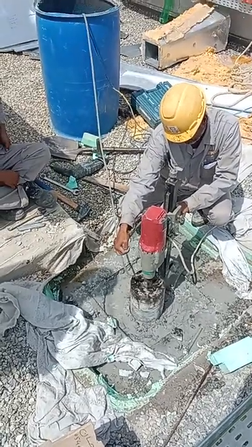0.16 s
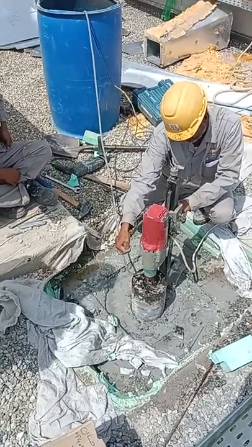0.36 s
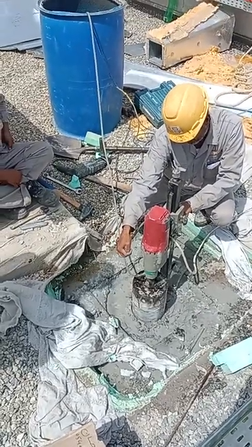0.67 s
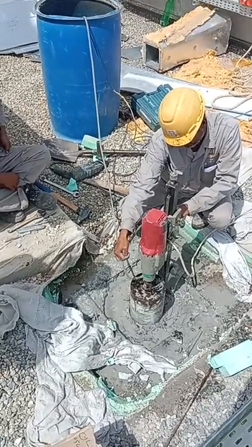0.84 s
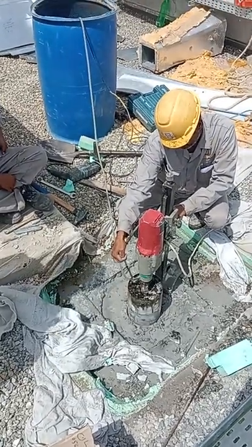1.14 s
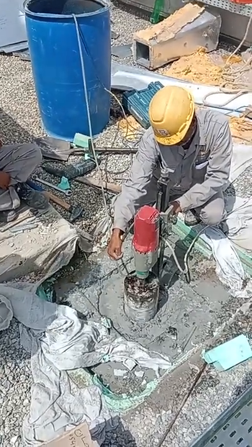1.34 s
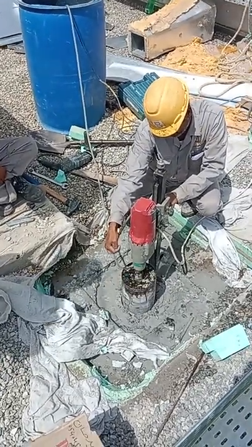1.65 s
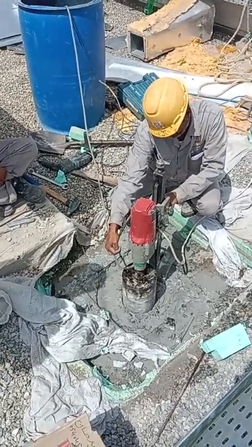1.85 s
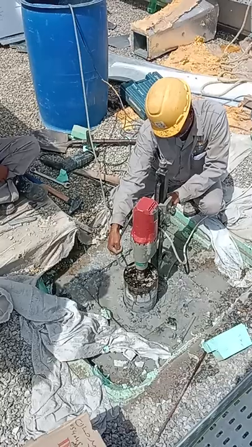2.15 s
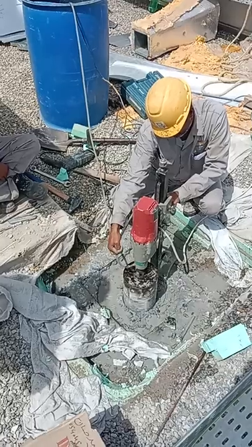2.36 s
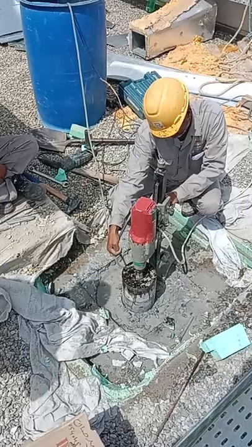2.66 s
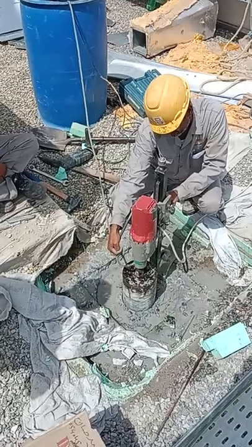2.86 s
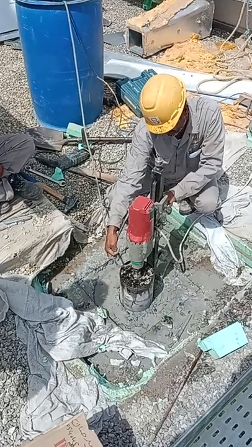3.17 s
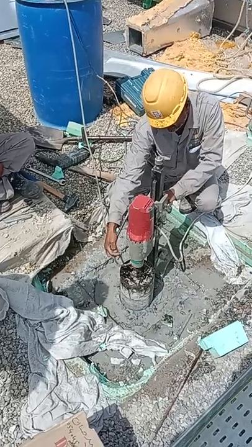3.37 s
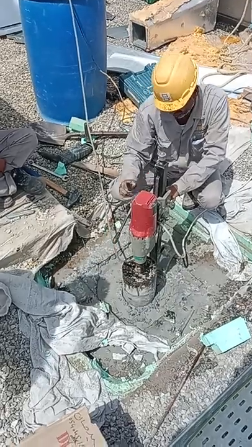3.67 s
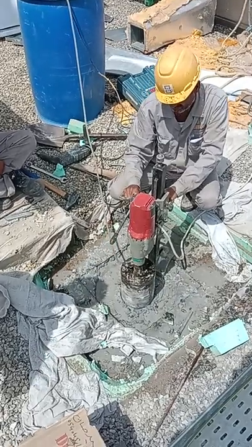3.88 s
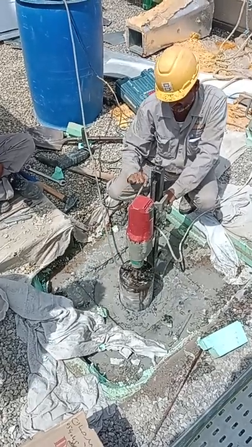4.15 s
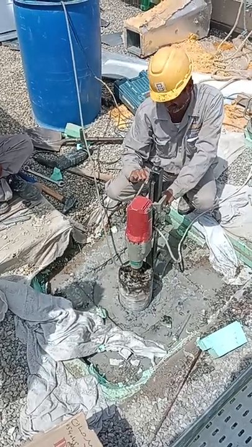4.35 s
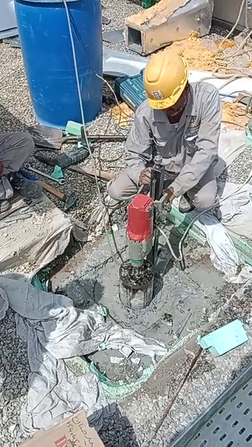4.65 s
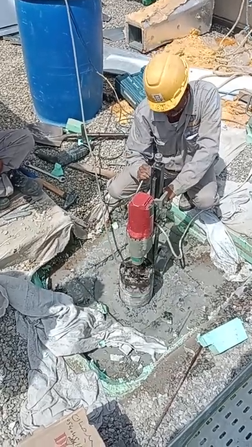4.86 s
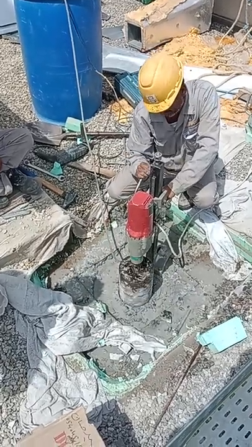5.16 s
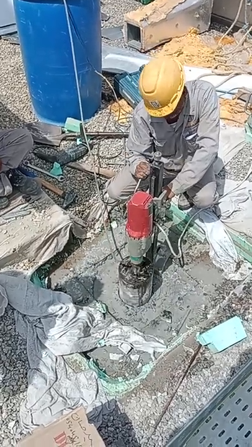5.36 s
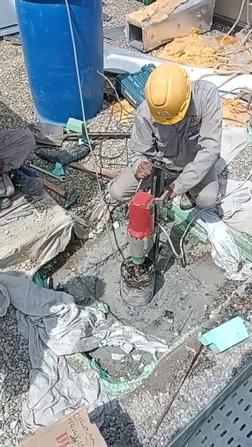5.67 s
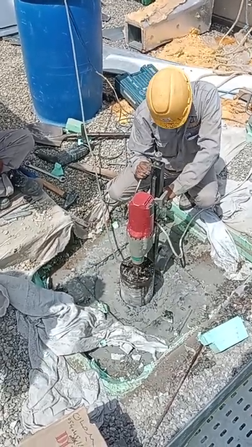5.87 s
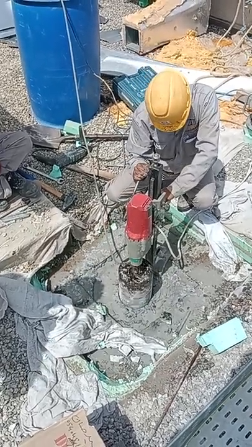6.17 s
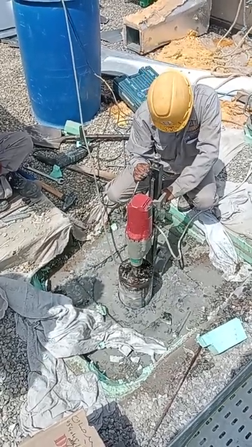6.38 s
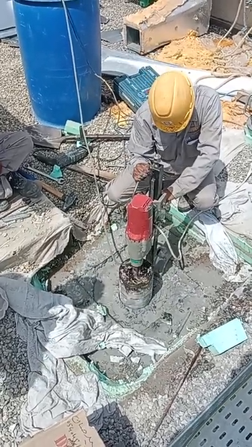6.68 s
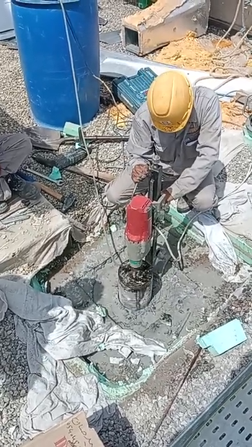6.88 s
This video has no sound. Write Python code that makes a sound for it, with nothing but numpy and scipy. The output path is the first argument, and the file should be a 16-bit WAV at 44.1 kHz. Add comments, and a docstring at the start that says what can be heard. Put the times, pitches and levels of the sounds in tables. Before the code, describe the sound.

A core drill is already running and never stops through seven seconds, close by in open air with only faint short reflections. Its motor gives a bright, hissy fan rush, a little brighter in the first second, over rasping gears, crunching concrete grit, a ringing steel barrel and a low stand drone. From 0 to 3.5 s the barrel wobbles, scraping and ringing about six times a second, with harder binding around 0.2-0.6, 1.5-2, 2.2-2.8 and 3-3.3 s; the contacts grow shorter. Small low wind puffs come near 1.3, 1.65 and 3.2 s. Then the cut smooths. A rough squeal rises slightly at 3.7-4.1 s, a lower one sounds at 4.3-4.9 s, and a stronger high one falls at 4.9-5.1 s as the grinding swells loudest. Chip snags knock near 3.95, 5, 5.2, 6.2 and 6.4 s; grinding eases, then continues steadily to the end.

```python
"""Crunching, ringing and rushing: an electric core drill on a stand cuts wet concrete outdoors, a few steps away.
Diamond grit crunches and rings the steel barrel, which at first runs out of true and catches once a turn,
then settles with a few loose snags. Feeding harder makes the cut, the gears and the motor's fan louder.
The bit squeals briefly as it sticks and slips, the stand drones, and wind puffs touch the microphone.
Fractures are random clicks sent through resonances; swells and slow chance shape their levels."""
import sys
import numpy as np
from scipy import signal
from scipy.fft import rfft, irfft, next_fast_len
from scipy.io import wavfile
from scipy.ndimage import uniform_filter1d, map_coordinates

SR = 44100
rng = np.random.default_rng(int(sys.argv[2]) if len(sys.argv) > 2 else 0)


def file_out(sig):
    """Save sig as 16-bit WAV at sys.argv[1]."""
    # one column per channel
    cols = np.atleast_2d(sig).T
    # limit, then scale
    lim = np.clip(cols, -1, 1)
    pcm = np.round(lim * 32767).astype(np.int16)
    wavfile.write(sys.argv[1], SR, pcm)


N = 309582
TIME = np.arange(N) / SR  # seconds
TURNS_PER_S, FIRST_CATCH_S = 5.92, 0.043


def from_db(db):
    """Decibels to amplitude gain."""
    return 10 ** (np.asarray(db) / 20)


def rms_one(x):
    """Scale to rms 1."""
    return x / np.sqrt(np.mean(x ** 2) + 1e-20)


def evened(x, window_s):
    """Hold the short-term rms near 1."""
    window = max(int(window_s * SR), 8)
    power = uniform_filter1d(x * x, window)
    return x / np.sqrt(np.maximum(power, 1e-12))


def in_time(rows):
    """The value columns of a curve, joined by straight lines at every sample."""
    s, *columns = np.transpose(rows)
    return [np.interp(TIME, s, column) for column in columns]


def drift(rate_hz):
    """Slow chance with spread 1: noise through a two-pole lowpass, made at every 40th sample."""
    step, warm_up = 40, 2000
    pole = np.exp(-2 * np.pi * rate_hz * step / SR)
    noise = rng.standard_normal(N // step + warm_up + 2)
    slow = signal.lfilter([1], [1, -2 * pole, pole * pole], noise)[warm_up:]
    return np.interp(np.arange(N) / step, np.arange(len(slow)), rms_one(slow))


def resonate(x, hz, width, order=1):
    """A resonance with gain 1 on top; order 2 has steeper skirts."""
    edges = np.clip([hz - width / 2, hz + width / 2], 10, .48 * SR)
    return signal.sosfilt(signal.butter(order, edges, "band", fs=SR, output="sos"), x)


def colour(x, points):
    """Filter by a spectrum of (Hz, dB) points joined along log frequency."""
    hz, db = np.transpose(points)
    size = next_fast_len(N)
    bins = np.maximum(np.fft.rfftfreq(size, 1 / SR), 1)
    gain = from_db(np.interp(np.log(bins), np.log(hz), db))
    return irfft(rfft(x, size) * gain, size)[:N]


def swells(rows):
    """Envelope of short swells that rise to a point and fall again; their powers add."""
    power = np.zeros(N)
    for s, db, half in rows:
        distance = np.abs((TIME - s) / half) ** 1.2
        power += from_db(2 * db) * np.exp(-2 * np.minimum(distance, 30))
    return np.sqrt(power)


def grit(per_s, spread_db):
    """Random tiny fractures of uneven size and either sign; rms 1."""
    sizes_db = spread_db * np.minimum(rng.exponential(1, N), 4)
    sizes = from_db(sizes_db) * rng.choice([-1, 1], N)
    return rms_one(sizes * (rng.random(N) < per_s / SR))


def turn():
    """Angle of the bit in radians, zero where it presses on the wall."""
    return 2 * np.pi * TURNS_PER_S * (TIME - FIRST_CATCH_S)


# Wind puffs on the microphone: centre_s, level_db, half_length_s
WIND_PUFFS = [(1.20, -41, .04), (1.29, -29, 0.026), (1.65, -37, .02), (3.21, -39, .015), (3.87, -42, 0.079),
              (4.72, -47, .08)]


def wind():
    """Soft low puffs of air on the microphone: swells of low, narrow noise."""
    air = resonate(rng.standard_normal(N), hz=115, width=81, order=2)
    return swells(WIND_PUFFS) * rms_one(air)


# Drone of the stand under the drill: time_s, level_db
STAND_DRONE = [(0, -40.5), (1.8, -36), (2.3, -42.5), (3.3, -38.5), (4.1, -57), (5, -42), (6.05, -38),
               (7.02, -42)]


def stand():
    """The shaken stand drones at its lowest mode."""
    drone_db, = in_time(STAND_DRONE)
    mode = resonate(grit(per_s=1500, spread_db=4.0), hz=211.4, width=41)
    return from_db(drone_db) * evened(mode, window_s=0.11)


# Resonances of the motor housing and its vents: pitch_hz, width_hz, level_db (relative, before the tilt)
HOUSING_MODES = [(4296, 364, -0.5), (4580, 320, -2), (4930, 270, -1), (5420, 150, -8.5),
                 (6140, 3800, -10.5), (6910, 750, -3), (7404, 560, 1.5), (7810, 240, -3), (8490, 710, -2),
                 (8830, 134, -3.5), (10300, 970, -17), (12550, 1600, -15), (15200, 1100, -18.5)]
# Tilt of the fan's hiss about 6 kHz, brighter at first: time_s, tilt_db_per_octave
HISS_TILT = [(.8, 1), (2, -.6), (7.02, -0.7)]
ROTOR_HZ = 402  # mean speed
RUSH_DB, RUSH_DB_PER_FEED_DB = -20.5, 0.42  # level at the usual feed, gain per dB of feed


def motor(feed_db):
    """Fan air and brush scratch ring in the housing, fluttering with the rotor and easing as the bit rubs."""
    tilt_db, = in_time(HISS_TILT)
    rotor = 2 * np.pi * np.cumsum(ROTOR_HZ * (1 + 0.0011 * drift(2))) / SR
    flutter_db = .25 * np.cos(rotor) - .35 * np.cos(2 * turn()) - .25 * np.cos(3 * turn())
    rush = np.zeros(N)
    for hz, width, db in HOUSING_MODES:
        gain = from_db(db + tilt_db * np.log2(hz / 6000) + .5 * drift(17))
        rush += gain * resonate(grit(per_s=14000, spread_db=4.5), hz, width, order=2)
    level_db = RUSH_DB + RUSH_DB_PER_FEED_DB * feed_db + flutter_db + 0.79 * drift(45)
    return rms_one(rush) * from_db(level_db)


# Resonances of the gear case: pitch_hz, width_hz, level_db (relative)
GEAR_CASE_MODES = [(2260, 440, -7.5), (2746, 250, -6.5), (2987, 92, -6), (3176, 152, -2.5),
                   (3427, 123, -4.5), (3805, 470, -11)]
RASP_DB, RASP_DB_PER_FEED_DB = -28, 1.1
RASP_DB_PER_SWING_DB = -0.73  # a wobbling barrel bites less evenly and loads the gears less


def gears(feed_db, swing_db):
    """Loaded teeth rattle the gear case: dense clicks excite each of its resonances."""
    rasp = np.zeros(N)
    for hz, width, db in GEAR_CASE_MODES:
        rasp += from_db(db) * resonate(grit(per_s=6000, spread_db=0.0), hz, width, order=2)
    load_db = RASP_DB_PER_FEED_DB * feed_db + RASP_DB_PER_SWING_DB * swing_db
    return rms_one(rasp) * from_db(RASP_DB + load_db + 0.9 * drift(18))


# Squeals of the rubbing bit: start_s, length_s, first_pitch_hz, last_pitch_hz, level_db (before the mix)
BIT_SQUEALS = [(3.70, .38, 2080, 2340, -31), (4.32, 0.62, 788, 818, -35.5), (4.87, .27, 2417, 2060, -25.5)]


def squeals():
    """Stick and slip at the rim gives rough tones that fade in, glide and fade out."""
    out = np.zeros(N)
    for start, length, first_hz, last_hz, db in BIT_SQUEALS:
        age = TIME - start
        fade_s = 0.036
        envelope = np.clip(np.minimum(age, length - age) / fade_s, 0, 1)
        hz = np.interp(age, [0, length], [first_hz, last_hz])
        rough_hz = hz * (1 + .006 * drift(80))
        phase = 2 * np.pi * np.cumsum(rough_hz) / SR
        out += envelope * from_db(db + 3.5 * drift(30)) * np.sin(phase)
    return out


# Modes of the steel barrel, before the warble: pitch_hz, width_hz, level_db (relative)
BARREL_MODES = [(650, 27, -7), (730, 33, -9.5), (791, 37, -7), (895, 46, -5), (1011, 59, -7), (1320, 61, 5),
                (1488, 156, -1), (1855, 70, 6.5), (1929, 82, 2.5), (2058, 82, 0.5)]


def barrel(force):
    """The steel tube rings; its pitch warbles as it turns and the contact wanders round the rim."""
    ring = np.zeros(N)
    for k, (hz, width, db) in enumerate(BARREL_MODES):
        ring += (-1) ** k * from_db(db) * resonate(force, hz, width)
    ring = signal.sosfilt(signal.butter(2, 3200, fs=SR, output="sos"), ring)
    bend = .009 * np.cos(turn() - .8) + .012 * drift(18)
    # read the ring faster and slower to bend its pitch
    position = np.arange(N) + np.cumsum(bend - bend.mean())
    return rms_one(map_coordinates(ring, [position], order=3, mode="mirror"))


# Bouts in which the barrel binds hard at every turn: start_s, end_s
BINDING_BOUTS = [(.15, .62), (1.48, 1.98), (2.16, 2.83), (3.0, 3.34)]
SETTLED_S = 3.5
CATCH_SCATTER_DB, CATCH_WEAR_S = 0.6, 3.3
# levels before the mix, half lengths before the hole wears
BRUSH_DB, BRUSH_HALF_S = -17, 0.027
BIND_DB, BIND_HALF_S = -12.5, .019


def wall_contacts():
    """One contact a turn until it settles, a long light brush or short hard bind, briefer as the hole wears."""
    rows = []
    for s in np.arange(FIRST_CATCH_S, SETTLED_S, 1 / TURNS_PER_S):
        binding = any(start < s < end for start, end in BINDING_BOUTS)
        db, half = (BIND_DB, BIND_HALF_S) if binding else (BRUSH_DB, BRUSH_HALF_S)
        scattered_db = db + CATCH_SCATTER_DB * rng.standard_normal()
        rows.append((s, scattered_db, half * np.exp(-s / CATCH_WEAR_S)))
    return rows


# Loose chips snag the barrel once it runs true: centre_s, level_db (before the mix)
CHIP_SNAGS = [(3.948, -17), (4.956, -11.5), (5.036, -15), (5.240, -15.5), (6.185, -14), (6.417, -17)]
# Dull scrape of the barrel on the wall of the hole: pitch_hz, level_db (relative)
SCRAPE_SPECTRUM = [(50, -40), (130, -22), (230, 1), (500, -4), (700, 0.5), (1100, -3), (1600, 0.5),
                   (2100, -8.5), (2600, -10), (4000, -14), (7000, -26.5)]
SNAG_HALF_S, SCRAPE_LINGER_S = 0.008, 0.0058


def catches(swing_db):
    """Contacts and snags ring the barrel; the further it runs out of true, the louder the wider dull scrape."""
    contacts = wall_contacts() + [(s, db, SNAG_HALF_S) for s, db in CHIP_SNAGS]
    longer = [(s, db, half + SCRAPE_LINGER_S) for s, db, half in contacts]
    scrape = evened(colour(grit(per_s=3000, spread_db=2.0), SCRAPE_SPECTRUM), window_s=0.02)
    scrape = scrape * from_db(2.7 * swing_db - 9.5) * swells(longer)
    ring = evened(barrel(grit(per_s=2500, spread_db=5.0)), window_s=0.012)
    ring = ring * from_db(-2.5) * swells(contacts)
    return (scrape + ring) * from_db(1.6 * drift(80))


# Broad crunch of crushed concrete: pitch_hz, level_db (relative)
CRUNCH_SPECTRUM = [(30, -42), (60, -41), (110, -9.5), (200, -3), (280, -0.5), (400, -0.5), (520, 0),
                   (900, -1), (1130, -6), (1400, -3), (2150, -0.5), (2500, -6), (4000, -3.5), (8000, -29)]
# level at the usual feed before the mix, and gain per dB of feed
RING_DB, RING_DB_PER_FEED_DB = -22, 0.73
CRUNCH_DB, CRUNCH_DB_PER_FEED_DB = -26, 1.05
SINK_DB_PER_S = 0.2  # the crunch is muffled as the bit sinks into the slab


def grinding(feed_db, swing_db):
    """Diamonds crush concrete and ring the barrel, hardest twice a turn."""
    pressure_db = swing_db * np.cos(2 * turn()) + 1.4 * drift(28)
    ring = evened(barrel(grit(per_s=1800, spread_db=2.0)), window_s=0.11)
    crunch = rms_one(colour(grit(per_s=2400, spread_db=2.0), CRUNCH_SPECTRUM))
    ring_db = RING_DB + RING_DB_PER_FEED_DB * feed_db + 0.26 * pressure_db
    crunch_db = CRUNCH_DB + CRUNCH_DB_PER_FEED_DB * feed_db + pressure_db
    crunch_db = crunch_db - SINK_DB_PER_S * TIME
    return from_db(ring_db) * ring + from_db(crunch_db) * crunch


# Reflections from the water drum and the site walls: delay_s, level_db (relative to the direct sound)
SITE_ECHOES = [(.0099, -16), (.0142, -17), (.0196, -20)]


def site(x):
    """The direct sound and a few weak, dull reflections; open air leaves no tail."""
    dull = signal.sosfilt(signal.butter(1, 2000, fs=SR, output="sos"), x)
    echoes = sum(from_db(db) * np.interp(TIME - delay, TIME, dull, left=0) for delay, db in SITE_ECHOES)
    return x + echoes


# How hard the bit is fed into the concrete: time_s, feed_db (about the usual pressure)
BIT_FEED = [(0, -0.4), (2.5, 0.4), (3.55, -0.7), (3.95, 0.4), (4.9, 2.25), (5.3, 0.3), (6.0, -0.5),
            (7.02, 0.1)]
# How far the barrel runs out of true: time_s, swing_db (of the rubbing)
BARREL_RUNOUT = [(0, 1.8), (1.7, 2.0), (3.2, 1.2), (3.7, .3), (7.02, .4)]


def scene():
    """Everything meets at one microphone, the same in both channels."""
    feed_db, = in_time(BIT_FEED)
    swing_db, = in_time(BARREL_RUNOUT)
    air = wind()
    machine = stand() + motor(feed_db) + gears(feed_db, swing_db)
    bit = squeals() + catches(swing_db) + grinding(feed_db, swing_db)
    mono = air + machine + from_db(-1.19) * site(bit)
    return np.array([mono, mono])


def record(dry):
    """The microphone loses deep bass, and the top is cut steeply."""
    thin = signal.sosfilt(signal.butter(1, 55, "high", fs=SR, output="sos"), dry)
    cutoff_hz = 15550
    return signal.sosfilt(signal.ellip(12, .1, 90, cutoff_hz, fs=SR, output="sos"), thin)


dry = scene()
out = record(dry)
file_out(out)
```